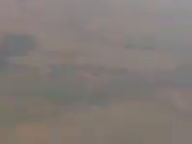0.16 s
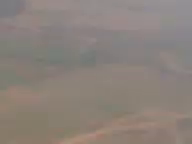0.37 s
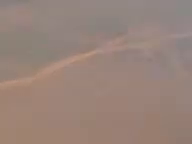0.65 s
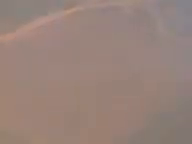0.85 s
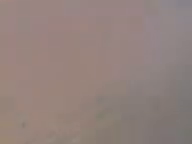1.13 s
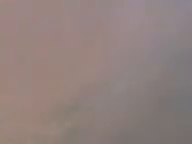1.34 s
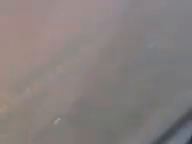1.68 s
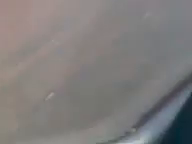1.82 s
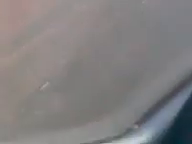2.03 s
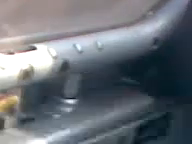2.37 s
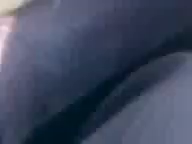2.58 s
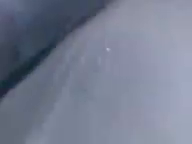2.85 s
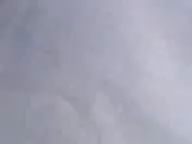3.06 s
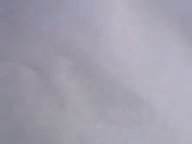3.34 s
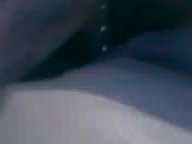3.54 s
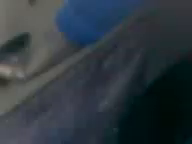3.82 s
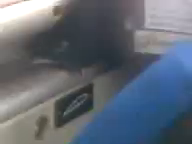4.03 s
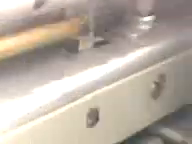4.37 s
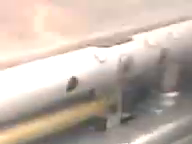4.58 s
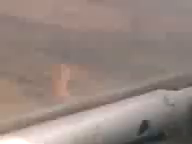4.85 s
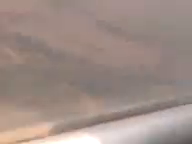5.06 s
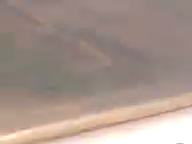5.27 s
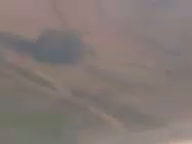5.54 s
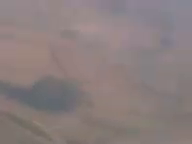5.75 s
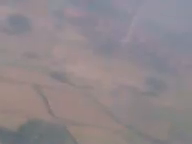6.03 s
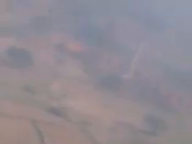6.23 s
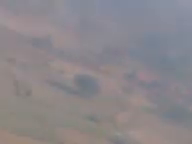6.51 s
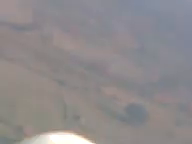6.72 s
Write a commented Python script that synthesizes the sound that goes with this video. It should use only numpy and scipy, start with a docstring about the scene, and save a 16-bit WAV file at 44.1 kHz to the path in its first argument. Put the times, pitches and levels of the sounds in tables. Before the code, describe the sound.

Steady air rush hisses and booms over a glider canopy, singing hollowly at first, with two hard clacks before the wind gradually sinks.

```python
"""Turbulent air hisses over the canopy of a glider in steady flight and makes the cockpit boom.
The wind is shaped noise; at first a gap sings hollowly and a leak whistles, as narrow noisy resonances.
A fitting clacks twice, as dense runs of decaying rings that the cockpit reflects; then the rush sinks.
A narrow-band microphone hears it all and flattens the highest peaks."""
import sys
import numpy as np
from scipy import signal
from scipy.fft import rfft, irfft
from scipy.io import wavfile

SR = 44100
rng = np.random.default_rng(int(sys.argv[2]) if len(sys.argv) > 2 else 0)


def persist_wave(psi):
    """Save psi, clipped to +-1, as 16-bit WAV."""
    counts = np.round(np.clip(psi, -1, 1) * 32767).astype(np.int16)
    wavfile.write(sys.argv[1], SR, np.atleast_2d(counts).T)


N = 303849


def amp(db):
    """Amplitude ratio of a level in dB."""
    return 10 ** (np.asarray(db) / 20)


def evened(x):
    """Normalization to an rms of 1."""
    return x / np.sqrt(np.mean(x ** 2) + 1e-20)


def read(points, hz):
    """Interpolation of a spectrum on a logarithmic frequency axis."""
    f, value = np.transpose(points)
    return np.interp(np.log(hz + 1), np.log(f + 1), value)


def curve(rows, axis=1):
    """Linear interpolation of one column of a timed table at every sample."""
    rows = np.asarray(rows)
    return np.interp(np.arange(N) / SR, rows[:, 0], rows[:, axis])


def hump(s, length):
    """Gaussian rise and fall around one moment."""
    return np.exp(-(2 * (np.arange(N) / SR - s) / length) ** 2)


def bins():
    """Frequencies of the discrete spectrum, in Hz."""
    return np.fft.rfftfreq(N, 1 / SR)


def bell(hz, width):
    """Lorentzian resonance curve, falling to half at half the width from its centre."""
    return 1 / (1 + (2 * (bins() - hz) / width) ** 2)


def noise(gain):
    """Spectral shaping of white noise, brought to an rms of 1."""
    return evened(irfft(rfft(rng.standard_normal(N)) * gain, N))


def eddies(rate_hz, depth_db):
    """Random amplitude modulation: eddies flutter the level, ever less above the given rate."""
    return amp(depth_db * noise((bins() > 3) / (1 + (bins() / rate_hz) ** 2)))


def wavering(x, rate_hz=3, share=0.018):
    """Frequency modulation by uneven reading speed: all pitches drift together by a small share."""
    speed = 1 + share * noise((bins() > .7) / (1 + (bins() / rate_hz) ** 2))
    return np.interp(np.cumsum(speed), np.arange(N), x, period=N)


def add(mix, s, sound):
    """Superposition of a short sound on the mix from one moment."""
    part = mix[round(s * SR):][:len(sound)]
    part += sound[:len(part)]


def driven(level_db, slope):
    """Flow-driven radiation: a layer's gain from its cruising level and its dB per dB of flow."""
    # strength of the airflow: t/s, level/dB
    flow = [(0, -35.5), (1.0, -35.5), (1.55, -36), (1.9, -34), (2.08, -38), (2.5, -37), (2.75, -40),
            (3.02, -43.5), (3.2, -42), (4.4, -42), (5.4, -43.5), (6.2, -46.5), (6.89, -50)]
    cruise_db = -40
    return amp(level_db + slope * (curve(flow) - cruise_db))


def canopy_rush():
    """Boundary-layer turbulence radiates broadband noise over the canopy and at its edges."""
    # air over the canopy: f/Hz, relative spectral level/dB
    rush_spectrum = [(150, -24), (400, -1.5), (560, 1), (700, 1), (820, 0), (960, -2.5), (1180, -1),
                     (1400, -2), (1900, -1), (2150, -0.5), (2450, -5.5), (2700, -12), (3100, -20),
                     (4500, -55.5)]
    # air at the canopy edges: f/Hz, relative spectral level/dB
    hiss_spectrum = [(1500, -36.5), (2400, -7), (2750, -6), (3000, -4.5), (3250, 0), (3500, 3),
                     (3700, -4.5), (4400, -3.5), (5000, -52.5)]
    # cockpit resonances that colour the rush: f/Hz, width/Hz, lift/dB
    cavity_modes = [(895, 50, 2.5), (983, 100, 3.5), (1530, 64, 5.5), (1600, 55, 0.5), (1717, 54, 4),
                    (1884, 110, 3)]
    cavity_db = sum(db * bell(f, width) for f, width, db in cavity_modes)
    rush = driven(-40, 1.085) * noise(amp(read(rush_spectrum, bins()) + cavity_db))
    # small eddies at the edges flutter faster than the large ones over the canopy
    hiss = driven(-53.5, 0.93) * noise(amp(read(hiss_spectrum, bins()))) * eddies(60, 1.5)
    return (rush + hiss) * eddies(24, 1.0)


def cockpit_boom():
    """Forced vibration: turbulence drives the cockpit air and shell as low-frequency noise."""
    # cockpit air and shell, low range: f/Hz, relative spectral level/dB
    boom_spectrum = [(15, -36.5), (35, -32.5), (60, -20.5), (100, -17), (120, -17), (138, -5.5),
                     (158, -6.5), (178, -5.5), (205, -11.5), (260, -34), (400, -71.5)]
    # cockpit air and shell, upper range: f/Hz, relative spectral level/dB
    rumble_spectrum = [(100, -55), (180, -14), (215, -2.5), (252, -1), (295, 2.5), (325, 1), (355, 0),
                       (415, -1), (460, -5), (540, -17.5), (800, -45.5), (1500, -71)]
    # bass against the rest of the wind: t/s, level/dB
    bass_levels = [(0, 1), (.35, -1.5), (.9, 1.5), (1.5, 1.8), (2.2, -3.5), (2.75, -1.2), (3.4, -0.5),
                   (3.6, -0.5), (4.8, 0), (5.4, 1), (5.74, 1.5), (5.8, -1.5), (6.2, 0.5), (6.89, 0)]
    boom = driven(-45.5, 1) * noise(amp(read(boom_spectrum, bins()))) * eddies(5.5, 0.98)
    rumble = driven(-40, 0.82) * noise(amp(read(rumble_spectrum, bins()))) * eddies(7.4, 0.86)
    return amp(curve(bass_levels)) * lulls() * (boom + rumble)


def lulls():
    """Amplitude modulation: the gain of the bass through its brief, mostly downward, changes."""
    # t/s, length/s, change of level/dB
    lull_rows = [(.115, 0.14, -3), (0.258, .04, -2), (2.07, .1, -2.5), (2.36, .07, 0.5), (2.597, .05, -0.5),
                 (3.05, 0.057, -3.5), (3.256, 0.08, -4.5), (3.452, 0.05, -8.5), (3.96, 0.058, -4.5),
                 (4.27, 0.063, -1.5), (4.847, .04, -4), (5.423, 0.042, -3.5), (6.114, 0.037, -2.5),
                 (6.728, 0.064, -3)]
    return amp(sum(db * hump(s, length) for s, length, db in lull_rows))


def gap_song():
    """Cavity resonance: air passing a gap at the canopy rim excites several hollow, drifting tones."""
    # f/Hz, width/Hz, relative level/dB
    gap_modes = [(583, 45, -3), (704, 140, -3), (1020, 180, -3.5), (1180, 140, -1.5), (1286, 60, 2),
                 (1450, 70, -1)]
    level_db, hold_s, fade_db_per_s = -36.5, 0.63, 43.5
    t = np.arange(N) / SR
    gain = amp(level_db - fade_db_per_s * np.maximum(t - hold_s, 0)) * eddies(14, 1.5)
    song = noise(sum(amp(db) * bell(f, width) for f, width, db in gap_modes))
    return gain * wavering(song)


def drone(track, width_hz, steady):
    """Noise-excited resonance; the steadier it is, the less its strength flutters."""
    shape = bell(0, width_hz)
    stir = noise(shape) + 1j * noise(shape)
    stir = stir / (abs(stir) + .1) ** np.clip(steady, 0, 1)
    # a rotating phase moves the slow noise up to the wanted pitch
    turn = np.exp(2j * np.pi * np.cumsum(curve(track)) / SR)
    return amp(curve(track, axis=2)) * evened((stir * turn).real)


def whistles():
    """Aeroacoustic resonance: the gap's main note and a breathy leak whistle as narrow-band noise."""
    # main note of the gap, wandering: t/s, f/Hz, level/dB
    gap_note = [(0, 1006, -39.5), (.25, 1011, -43.5), (.45, 1050, -40.5), (.68, 1036, -43),
                (.85, 1030, -54), (1.1, 1042, -82)]
    # leak at the canopy rim, rising a little overall until it closes: t/s, f/Hz, level/dB
    leak = [(0, 2333, -67), (.45, 2355, -46.5), (1.45, 2420, -45.5), (1.85, 2440, -46.5),
            (2.1, 2402, -43.5), (2.45, 2500, -45), (2.7, 2514, -69)]
    return drone(gap_note, width_hz=84, steady=0.087) + drone(leak, width_hz=340, steady=.05)


def cabin_modes():
    """Enclosure resonance: air stirs three cabin modes into uneven drones."""
    # modes shift as the listening point moves about in the cabin; each table: t/s, f/Hz, level/dB
    low_mode = [(0, 145.9, -40.5), (.6, 152.1, -43), (1.35, 163.9, -38.5), (1.85, 152, -36.5),
                (2.1, 158, -44.5), (2.7, 163, -41.5), (3.0, 157, -48), (3.35, 172, -44.5),
                (3.8, 159.5, -46.5), (4.4, 158.6, -45.5), (5.15, 160.2, -48.5), (5.72, 147, -40.5),
                (5.88, 160, -49.5), (6.55, 155.7, -55.5), (6.89, 144.8, -45)]
    middle_mode = [(0, 249.5, -46), (.7, 248, -40.5), (1.5, 252, -40.5), (2.15, 261.6, -40.5),
                   (2.35, 294.6, -47.5), (3.0, 294, -48.5), (3.55, 300, -47.5), (4.15, 280, -45),
                   (4.55, 286.9, -43.5), (4.8, 274.1, -49), (5.35, 242.8, -44.5), (5.7, 240, -59),
                   (6.05, 258.7, -49), (6.89, 287.5, -58.5)]
    high_mode = [(0, 364.6, -45.5), (.85, 352.2, -42), (1.35, 335, -38.5), (1.9, 362.6, -37),
                 (2.1, 398.5, -46), (2.5, 415.1, -49.5), (2.9, 412.6, -55), (4.3, 410, -55),
                 (5.4, 404.8, -51.5), (6.89, 398, -66)]
    cabin = drone(low_mode, width_hz=28, steady=.2)
    cabin += drone(middle_mode, width_hz=46, steady=.05)
    cabin += drone(high_mode, width_hz=45, steady=.05)
    return cabin * lulls() * eddies(13, 1.5)


def clacks(rise=0.00032, crack_db=-6, crack_decay=0.0018, frame_db=-25, echo_db=-6.0):
    """Impact excitation: each contact gives a ring, a crack and a thud; the frame and cabin answer."""
    # hard contacts within the two clacks:
    # t/s, level/dB, ring f/Hz, ring t60/s, level sent to thud, frame and cockpit/dB
    contacts = [(1.9682, -5.5, 1500, .0025, -15), (1.9735, -10, 2800, .01, 2.5),
                (1.9753, 1.5, 2580, 0.0085, -19), (1.9778, -7.5, 2600, 0.012, -16.5),
                (1.9799, 0.5, 2480, 0.014, -13), (1.9810, -2, 2450, 0.014, -8.5),
                (1.9820, 2, 1250, 0.012, -9), (1.9842, -6, 3460, 0.01, -23),
                (1.9845, -6, 1075, 0.0111, -20), (1.9871, 5.5, 790, 0.0089, -21.5),
                (1.9920, -12.5, 1300, 0.021, -17), (1.9925, -21, 3400, .014, -14.5),
                (2.0012, -10, 1400, 0.0036, -11.5), (2.0052, -12.5, 1900, 0.0074, -11),
                (2.012, -21.5, 1850, 0.035, -9), (2.0175, -19, 1900, 0.013, -15.5),
                (2.031, -18, 2105, .015, -10.5), (2.1842, -19.5, 380, 0.014, -2.5),
                (2.1878, -9, 1780, 0.016, -11), (2.1910, -4, 1955, 0.014, -12.5),
                (2.1918, -6.5, 850, 0.0059, -7), (2.1925, -14, 3650, 0.015, -6.5),
                (2.1960, 0, 1300, 0.0054, -4.5), (2.1982, -4, 1890, 0.0084, -8),
                (2.2009, -0.5, 1550, 0.0049, -5), (2.2002, -8, 686, 0.0078, -4.5),
                (2.2050, -14, 1200, .012, -8.5), (2.2102, -9, 1290, 0.005, -7.5),
                (2.2186, -18, 1590, .008, -6.5), (2.2230, -14, 700, .01, -7),
                (2.2284, -12.5, 2040, 0.015, -10.5), (2.2390, -20, 2130, 0.0061, -2.5),
                (2.2462, -16, 900, 0.0062, -4), (2.2700, -19, 1950, .014, -9.5)]
    # ring of the canopy and frame after every contact: f/Hz, relative level/dB, t60/s
    frame_modes = [(421, -8, 0.24), (677, -1.5, 0.15), (717, 1, 0.19), (932, 1, 0.16), (1073, 1.5, 0.1),
                   (1273, 2, 0.19), (1505, -0.5, 0.21), (1683, 3.5, .12), (1797, 1, .14), (1934, 1, 0.14),
                   (2147, -3, 0.13), (2250, -1.5, .14), (3484, -8, 0.12)]
    # dull push of each contact on the cockpit wall
    thud_hz, thud_t60_s, thud_db = 481, 0.0065, -16
    t = np.arange(SR // 4) / SR
    direct, sent = np.zeros(N), np.zeros(N)
    band = signal.butter(2, [250, 3800], "band", fs=SR, output="sos")
    thud = amp(thud_db - 60 * t / thud_t60_s) * np.sin(2 * np.pi * thud_hz * t)
    for s, db, hz, t60, send_db in list(contacts) + bounces():
        ring = np.sin(2 * np.pi * hz * t) * amp(-60 * t / t60) * (1 - np.exp(-t / rise))
        grit = evened(signal.sosfilt(band, rng.standard_normal(len(t))))
        crack = amp(crack_db) * grit * np.exp(-t / crack_decay)
        frame = sum(amp(d - 60 * t / life) * np.sin(2 * np.pi * (f * t + rng.random()))
                    for f, d, life in frame_modes)
        body = thud + amp(frame_db) * frame
        add(direct, s, amp(db) * (ring + 0.43 * crack + amp(send_db) * body))
        add(sent, s, amp(db + send_db) * (1.1 * ring + crack + thud))
    # small parts radiate little bass
    high_pass = signal.butter(2, 240, "high", fs=SR, output="sos")
    return signal.sosfilt(high_pass, direct + amp(echo_db) * cockpit(sent))


def bounces():
    """Energy loss in repeated impact: uneven small contacts weaken overall as the fitting settles."""
    # chatter after each clack: t/s, length/s, starting level/dB
    rattles = [(1.992, .045, -24.5), (2.206, .08, -21)]
    gap_s, fade_db_per_s, scatter_db, send_db = 0.0055, 161, 5.5, 4
    low_hz, high_hz, t60_s = 805, 2340, 0.014
    rows = []
    for s, length, db in rattles:
        for k, (late, size, pitch) in enumerate(rng.random((24, 3))):
            after = (k + late) * gap_s
            if after < length:
                level = db - fade_db_per_s * after + scatter_db * (2 * size - 1)
                hz = low_hz + pitch * (high_hz - low_hz)
                rows.append((s + after, level, hz, t60_s, send_db))  # columns of the hard contacts
    return rows


def cockpit(x, delay=0.0019):
    """Reverberation: dense reflections of the tiny cabin decay at a rate set by frequency."""
    # f/Hz, t60/s
    decay_times = [(150, 0.26), (500, 0.43), (1200, 0.14), (2500, 0.123), (4000, 0.12)]
    size = SR // 2
    taps = rng.choice([-1., 1.], size) * (rng.random(size) < 3000 / SR)  # about 3000 per second
    hz, t, z = signal.stft(taps, SR, nperseg=256)
    fading = amp(-60 * t / read(decay_times, hz)[:, None])
    tail = signal.istft(z * fading, SR, nperseg=256)[1]
    tail *= np.arange(len(tail)) / SR > delay
    return signal.fftconvolve(x, tail / np.linalg.norm(tail))[:N]


def low_thumps(swell=0.015):
    """Transient resonance: short low thumps of the cabin, each a sine that swells and decays."""
    # one, at 300 Hz, is the dull after-ring of the second clack: t/s, f/Hz, peak level/dB
    thump_rows = [(0.192, 135, -31), (0.279, 143.5, -29), (2.186, 140.5, -34), (2.255, 300, -31),
                  (2.475, 411, -34.5), (2.545, 138, -35.5), (2.655, 167, -30), (2.746, 148, -35.5),
                  (3.123, 295, -36), (3.348, 174, -35.5), (3.851, 162, -43), (4.356, 157, -37)]
    t, out = np.arange(SR // 4) / SR, np.zeros(N)
    envelope = (t / swell * np.exp(1 - t / swell)) ** 2
    for s, hz, db in thump_rows:
        add(out, s, amp(db) * envelope * np.sin(2 * np.pi * hz * t))
    return out


def puffs():
    """Band-limited turbulence: the hiss swells briefly and unevenly in one band."""
    # t/s, length/s, f/Hz, width/Hz, level/dB
    puff_rows = [(0.358, 0.078, 1310, 400, -35.5), (1.4, 0.68, 645, 250.5, -42.5),
                 (1.804, .16, 1797, 300, -43), (2.293, 0.462, 2736, 300, -48.5),
                 (2.45, 0.45, 660, 500, -48), (2.45, 0.14, 1500, 900, -47.5), (2.493, 0.11, 3540, 400, -47),
                 (2.617, 0.098, 3520, 403, -48), (2.713, 0.044, 1860, 140, -42.5),
                 (2.81, .06, 1900, 200, -48), (3.283, 0.21, 1790, 250, -51), (3.64, 0.12, 2075, 400, -46),
                 (3.92, 0.072, 3470, 298, -50), (4.028, 0.22, 1894, 132, -46),
                 (4.499, 0.7, 1522, 50, -50.5), (5.013, 0.076, 2800, 320, -51),
                 (6.827, 0.28, 1630, 350, -55)]
    swells = sum(amp(db) * hump(s, length) * noise(bell(hz, width))
                 for s, length, hz, width, db in puff_rows)
    return swells * eddies(30, 1.8)


def scene():
    """Superposition of the wind, its resonances, the low thumps and the clacks in one channel."""
    wind = canopy_rush() + cockpit_boom() + gap_song() + puffs()
    tones = whistles() + cabin_modes() + low_thumps()
    return (wind + tones + clacks())[None]


def record(dry):
    """Band limiting and overload: a narrow-band microphone, flattened peaks and a low-pass."""
    # response of the microphone: f/Hz, level/dB
    response = [(10, -2), (3550, -0.5), (3750, -1), (3950, -8), (4150, -13.5), (4350, -20.5), (4550, -30),
                (4800, -82.5)]
    overload, edge_hz = .69, 16000
    heard = irfft(rfft(dry) * amp(read(response, bins())), N)
    clipped = np.clip(heard, -overload, overload)
    low_pass = signal.firwin(511, edge_hz, window=("kaiser", 9), fs=SR)
    return signal.oaconvolve(clipped, low_pass[None], "same")


dry = scene()
out = record(dry)
persist_wave(out)
```